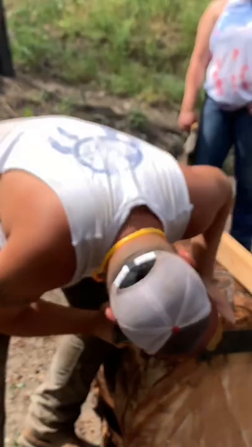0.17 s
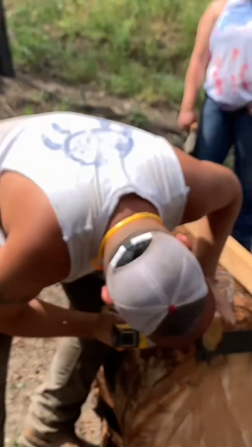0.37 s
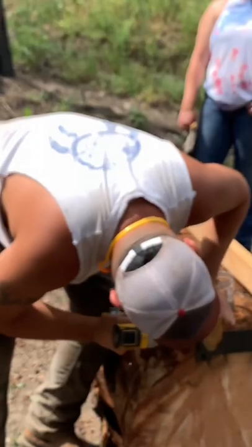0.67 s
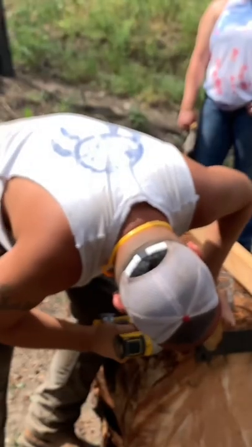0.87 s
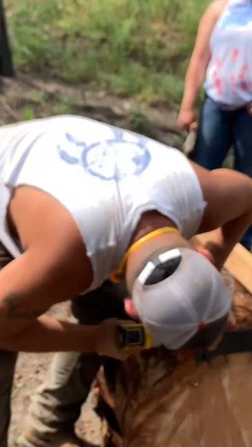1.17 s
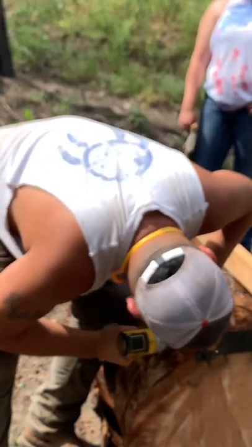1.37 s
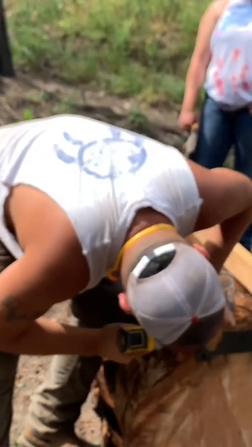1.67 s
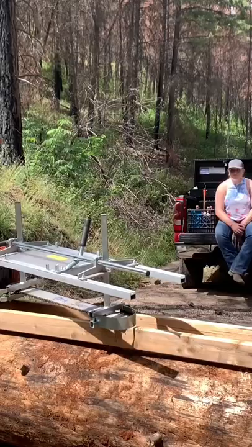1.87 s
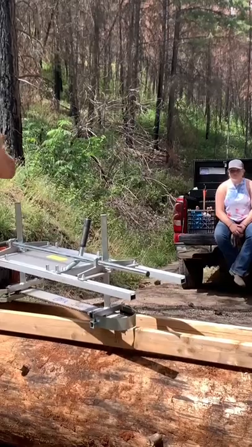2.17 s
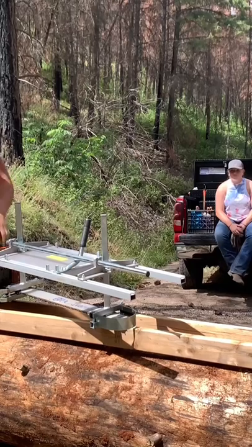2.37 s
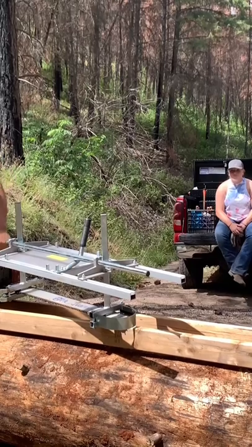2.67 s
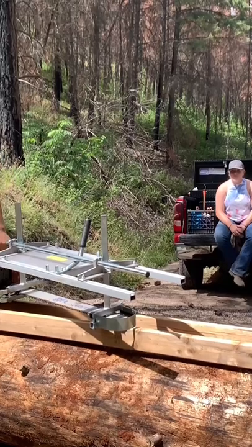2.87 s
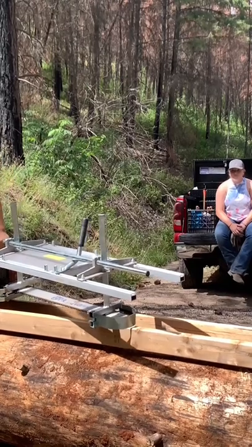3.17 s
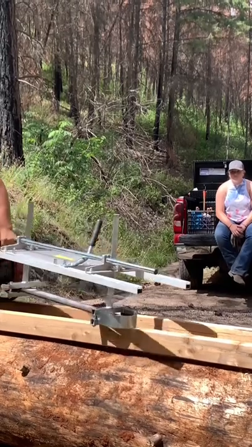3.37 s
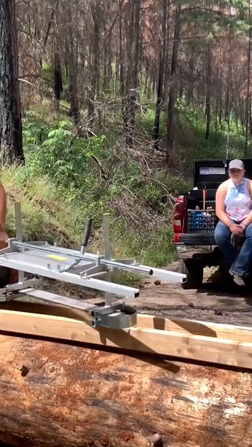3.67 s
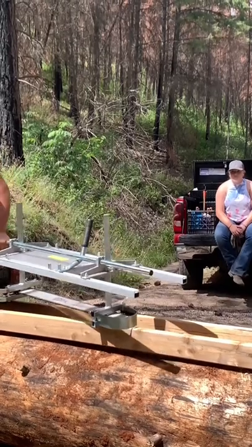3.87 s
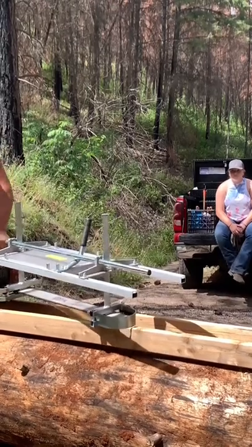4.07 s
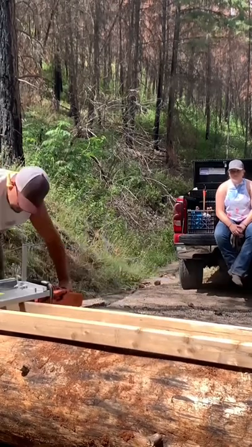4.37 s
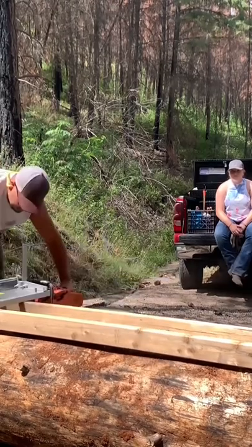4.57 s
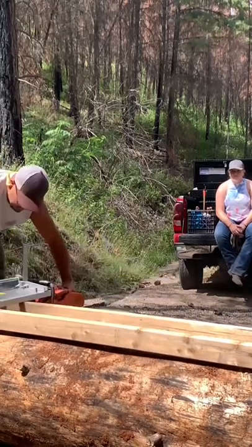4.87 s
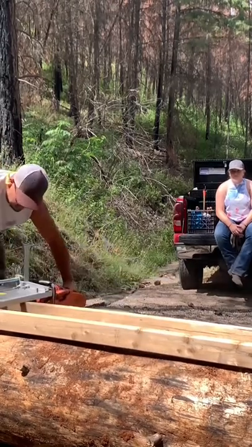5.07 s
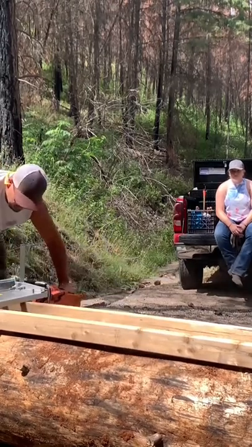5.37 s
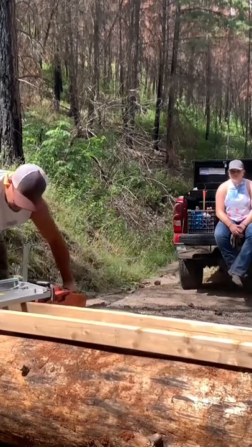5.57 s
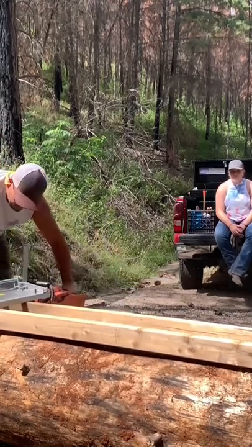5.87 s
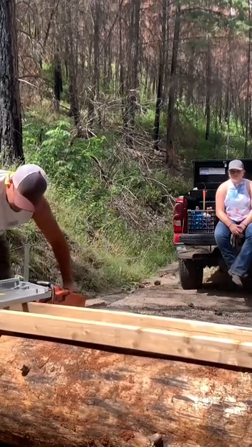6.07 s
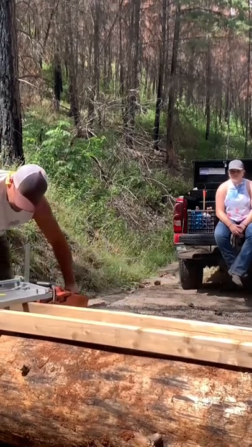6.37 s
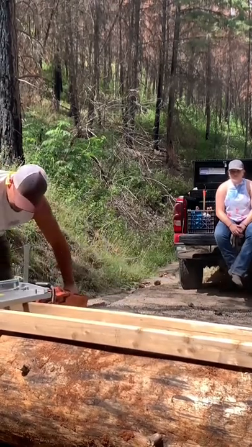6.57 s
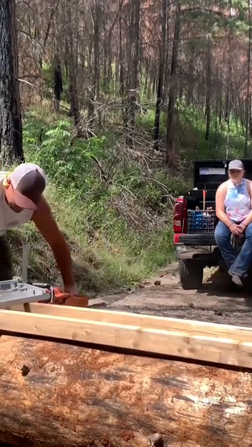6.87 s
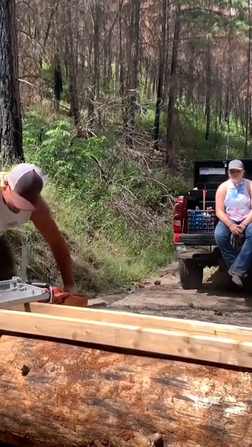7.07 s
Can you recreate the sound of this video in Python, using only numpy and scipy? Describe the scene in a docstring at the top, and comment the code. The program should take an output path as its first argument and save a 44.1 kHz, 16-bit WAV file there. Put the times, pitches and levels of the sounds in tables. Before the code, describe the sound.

Insects trill while an impact driver hammers two screws into a log, then a petrol chainsaw is cord-started, idles, blips and screams at full throttle outdoors.

```python
"""Impact driver and chainsaw in a clearing

Insects trill as filtered noise. An impact driver sinks two screws into a log: gear noise whirrs, each blow
starts decaying log and steel tones. A two-stroke chainsaw is pulled over and idles, burning on some turns
only, then is blipped to full speed: crank-timed pulses excite air box and muffler, noise makes the chain.
Two microphone ports hear it with their own phases and echoes; the level dips to silence three times."""
import sys
import numpy as np
from scipy import signal
from scipy.fft import rfft, irfft, next_fast_len
from scipy.io import wavfile
from scipy.ndimage import uniform_filter1d, map_coordinates

SR = 44100
rng = np.random.default_rng(int(sys.argv[2]) if len(sys.argv) > 2 else 0)


def master(y):
    """Save y as 16-bit WAV."""
    cut = np.clip(np.atleast_2d(y).T, -1, 1)
    pcm = np.round(cut * 32767)  # scale
    wavfile.write(sys.argv[1], SR, pcm.astype(np.int16))


N = 318843

# Brief dips to silence: centre_s, fade_s (each way)
DIPS = [(0.2, 0.047), (1.844, 0.039), (4.27, 0.0077)]
# Hammer blows: start_s, level_db (relative)
BLOWS = [(0.552, -1.5), (0.588, -11.5), (0.614, -11.5), (0.622, -3.5), (0.633, -8.5), (0.646, -13),
         (0.664, -15), (1.136, -17.5), (1.165, 1.5), (1.192, -0.5), (1.214, 0.5), (1.234, -9), (1.259, -8),
         (1.283, -6), (1.307, -9), (1.329, -17), (1.351, -13), (1.371, -16.5), (1.387, -15), (1.408, -10.5),
         (1.418, -13), (1.43, -17)]
# Screws: trigger_s, at_speed_s, let_go_s, motor_db, log ring over the blow first_db, last_db
SCREWS = [(0.46, 0.56, 0.672, -28.5, -10, -6), (1.11, 1.154, 1.43, -19.5, -26.5, 4)]
# Idle levels over time: time_s, exhaust_db, rattle_db (relative)
IDLE = [(3.21, -34, -57), (3.238, -18.5, -47), (3.362, -15.5, -52.5), (4.2, -19, -52.5), (4.26, -22.5, -64)]
# Spectrum of the saw's rattle and cracks: pitch_hz, density_db (relative)
RATTLE = [(530, -26.5), (900, -18.5), (1300, -28.5), (1940, -42.5), (2590, -22.5), (2860, -29.5),
          (4430, -33.5), (6540, -30), (8660, -27), (10800, -24.5), (13400, -33.5), (15200, -28),
          (16500, -58.5)]
# The muffler's second chamber: pitch_hz, width_hz, level_db
OUTLET = [(440, 300, -2), (893, 670, -5), (2370, 840, -5)]
# Throttle blips: open_s, shut_s, crank_hz, crank_at_shut_hz, easing of the climb (no unit), then relative
# levels: intake_db, exhaust_db, exhaust_at_shut_db, coasting_exhaust_db, chain_db, coasting_chain_db
BLIPS = [(4.296, 4.376, 53.14, 69.27, .3, -16, -18, -14, -17.5, -34.5, -41.5),
         (4.547, 4.646, 56.62, 79.36, 0.74, -14.5, -18.5, -14.5, -19.5, -26.5, -26.5),
         (4.837, 4.986, 60.46, 112.8, -0.04, -15, -19, -14.5, -19, -21, -20.5),
         (5.04, 5.279, 104.5, 142, 3, -14, -14, -17, -23.5, -21.5, -27.5),
         (5.427, 5.642, 109.1, 169.9, 0.97, -16.5, -19.5, -12.5, -17.5, -23, -26)]
# Turning points of the speed swings flat out: time_s, crank_hz
HUNT = [(5.55, 156.1), (5.745, 181.8), (5.9, 167.3), (6.038, 181), (6.172, 169.6), (6.299, 179.6),
        (6.435, 165.9), (6.549, 176.5), (6.65, 167.7), (6.743, 175.2), (6.838, 166.1), (6.932, 164.8),
        (7.03, 159.5), (7.17, 167.4), (7.3, 164)]

SECOND_PUFF_S = .0065  # the gas column swings back and puffs again


def amp(db):
    """Decibels to linear gain."""
    return 10 ** (np.asarray(db) / 20)


def unit(x):
    """x scaled to an rms of 1."""
    return x / np.sqrt(np.mean(x ** 2) + 1e-20)


def even(x, seconds):
    """x held at a running rms of 1."""
    return x / np.sqrt(np.abs(uniform_filter1d(x ** 2, int(seconds * SR))) + 1e-9)


def along(points, hz):
    """Read (pitch_hz, value) points on a log frequency axis."""
    f, v = np.transpose(points)
    return np.interp(np.log(hz + 1), np.log(f + 1), v)


def curves(rows):
    """A soft-edged gate open inside the rows' span, then one value per sample for each column."""
    s, *columns = np.transpose(rows)
    t = np.arange(N) / SR
    gate = uniform_filter1d(1. * ((t > s[0]) & (t < s[-1])), size=300)
    return [gate] + [np.interp(t, s, column) for column in columns]


def wobble(rate):
    """A smooth random curve, rate knots a second."""
    knots = rng.standard_normal(int(N * rate / SR) + 4)
    return map_coordinates(knots, [np.arange(N) * rate / SR])


def filtered(x, response):
    """x times a complex response of frequency."""
    m = next_fast_len(N + SR // 2)
    return irfft(rfft(x, m) * response(np.fft.rfftfreq(m, 1 / SR)), m)[..., :N]


def noise(spectrum, channels=1, patchy_db=0):
    """Coloured noise of rms 1 with time-frequency patches of random gain."""
    z = signal.stft(rng.standard_normal((channels, N)), nperseg=256)[2]
    field = uniform_filter1d(rng.standard_normal(z.shape[1:]), size=3, axis=0)
    field = uniform_filter1d(field, size=5, axis=1)
    white = signal.istft(z * amp(patchy_db * unit(field)), nperseg=256)[1][:, :N]
    return unit(filtered(white, lambda hz: amp(along(spectrum, hz))))


def resonant(x, modes):
    """x through parallel resonances of alternating sign, modes as (pitch_hz, width_hz, level_db)."""
    def response(f):
        total = 0
        for k, (centre, width, db) in enumerate(modes):
            band = 1j * f * width
            total = total + (-1) ** k * amp(db) * band / (centre ** 2 - f * f + band)
        return total
    return filtered(x, response)


def pulses(seconds, sizes):
    """Impulses shared between the two nearest samples."""
    at = np.clip(np.asarray(seconds) * SR, 0, N - 2)
    i = at.astype(int)
    return np.bincount(i, sizes * (1 - at + i), N) + np.bincount(i + 1, sizes * (at - i), N)


def bursts(seconds, dbs, t60):
    """An envelope that rises fast at each time and dies away."""
    t = np.arange(SR // 4) / SR
    shape = amp(-60 * t / t60) * (1 - np.exp(-t / .0015))
    return signal.fftconvolve(pulses(seconds, amp(dbs)), shape)[:N]


def turn_times(angle):
    """Moments at which the crank angle (in turns) passes a whole number."""
    return np.interp(np.arange(np.ceil(angle[0]), angle[-1]), angle, np.arange(N) / SR)


def place(x, ports, side, t60, wet_db, dull_hz):
    """Two ports hear the source at different phases and levels, plus unrelated echoes off the trees."""
    # Colour of the echoes: pitch_hz, level_db (relative)
    scatter = [(100, -26), (600, -20), (1500, -8), (4000, -2), (9000, -7), (15000, -5)]

    def port_response(hz):
        phase = np.exp(np.outer([.5j, -.5j], np.interp(hz, *np.transpose(ports))))
        return phase * amp(np.outer([.5, -.5], along(side, hz)))

    direct = filtered(x, port_response)
    hop = int(.1 * SR)  # the echo tail is redrawn this often, so its colour never stands still
    window = np.sin(np.pi * np.arange(2 * hop) / (2 * hop))
    fall = amp(-60 * np.arange(SR // 2) / SR / t60)
    wet = np.zeros((2, N + SR))
    x = np.pad(x, (0, 2 * hop))
    for i in range(0, N, hop):
        tail = rng.standard_normal((2, len(fall))) * fall / np.linalg.norm(fall)
        echo = signal.fftconvolve([x[i:i + 2 * hop] * window], tail, axes=1)
        wet[:, i:i + echo.shape[1]] += echo
    return direct + filtered(wet[:, :N], lambda hz: amp(wet_db + along(scatter, hz)) / (1 + (hz / dull_hz) ** 2))


def insects(passage):
    """A high trill: narrow-coloured noise in each port, with a quick random flutter."""
    # Insect spectrum: pitch_hz, density_db (relative)
    trill = [(3530, -65), (6000, -42), (7870, -21), (8570, -18.5), (10200, -4.5), (10800, -11),
             (11800, -21.5), (13500, -42)]
    # Mean level in each passage, parted by the first two dips: level_db
    passage_db = [-54, -52.5, -59.5]
    return amp(np.take(passage_db, passage) + 2.0 * wobble(50)) * noise(trill, channels=2)


def breeze():
    """Leaf noise partly shared by the ports, and low wind buffeting common to both."""
    # Breeze spectrum: pitch_hz, density_db (relative)
    leaf_colour = [(18, -30), (30, -17), (71, -27), (163, -10.5), (575, -11), (777, -13.5), (1090, -20),
                   (1190, -24.5), (5000, -43.5), (6500, -80), (11000, -120)]
    # Wind on the ports: centre_s, level_db, width_s
    gusts = [(1.9, -65.5, .04), (2.1, -63.5, .1), (2.254, -60.5, .05), (2.35, -63, .1), (2.8, -64, 0.11),
             (3.01, -45, 0.024), (3.2, -51, 0.044)]
    t = np.arange(N) / SR
    gate = curves([(DIPS[1][0],), (IDLE[0][0],)])[0]  # from the second dip until the saw catches
    leaves = noise(leaf_colour, channels=3)
    rustle = amp(-61 + 1.7 * wobble(11)) * (leaves[0] + .5 * leaves[1:])
    push = sum(amp(db) * np.exp(-((t - s) / width) ** 2) for s, db, width in gusts)
    buffet = push * noise([(20, -24), (45, 2.0), (65, 4.0), (110, -16), (200, -67.0)])
    return gate * (rustle + buffet)


def clearing():
    """Insects throughout; steady noise of the woods up to the second dip, a breeze after it."""
    # Woods spectrum: pitch_hz, density_db (relative)
    murmur = [(35, -45), (60, 2), (937, -8), (1100, -8.5), (2250, -23.5), (2540, -13.5), (3420, -20.5),
              (7000, -15.5), (9100, -33), (15400, -120)]
    passage = np.searchsorted([s for s, _ in DIPS[:-1]], np.arange(N) / SR)
    woods = (passage < 2) * amp(-67.0) * noise(murmur, channels=2)
    return insects(passage) + breeze() + woods


def motor_level():
    """Gain of the whirr: each trigger pull swells up to speed, holds, then is braked."""
    start_db, stop_s, stop_db = -22.5, .025, -35.5  # levels against the running motor
    level = 0
    for trigger, at_speed, let_go, db, *_ in SCREWS:
        gate, level_db = curves([(trigger, db + start_db), (at_speed, db), (let_go, db),
                                 (let_go + stop_s, db + stop_db), (let_go + 2 * stop_s, db + 1.3 * stop_db)])
        level = level + gate * amp(level_db)
    return level


def ringing_blows():
    """Each blow starts decaying log modes, louder as the screw seats, and a steel tone of unsteady phase."""
    # Log modes: pitch_hz, level_db (relative), t60_s
    log_modes = [(241, -13.5, 0.34), (255.6, -16, 0.47), (492, -12, 0.12), (703, 2, 0.081),
                 (870, 4.5, 0.026), (1092, 1.5, 0.035), (1660, -4, .03), (144, -18.5, 0.13)]
    s, db = np.transpose(BLOWS)
    seat = np.reshape([(b, first, c, last) for _, b, c, _, first, last in SCREWS], (-1, 2))
    log_db = np.interp(s, *seat.T)
    steel_hz = 3355 * np.exp(0.18 * rng.standard_normal(len(s)))  # another pitch each blow
    t = np.arange(SR // 2) / SR
    rise = 1 - np.exp(-t / 0.0029)
    sound = np.zeros(N)
    for start, blow_db, wood_db, hz in zip(s, db, log_db, steel_hz):
        ring = 0
        for mode_hz, mode_db, t60 in log_modes:
            fade = amp(mode_db + rng.normal(0, 0.61) - 60 * t / t60)
            ring = ring + fade * np.sin(2 * np.pi * mode_hz * rng.normal(1, 0.014) * t)
        drift = np.cumsum(rng.normal(0, 0.28, len(t)))  # phase, radians
        clack = amp(-60 * t / 0.07) * np.sin(2 * np.pi * hz * t + drift)
        blow = amp(blow_db + wood_db) * ring + amp(blow_db - 12.5) * clack
        sound[int(start * SR):][:len(t)] += blow * rise
    return sound


def driver():
    """Gear noise whirrs and bursts at each hammer blow, over the ringing log and tool."""
    # Gear spectrum: pitch_hz, density_db (relative)
    gears = [(180, -60.5), (300, -19), (607, -14), (694, -6.5), (1480, -11.5), (4030, -12.5), (6780, -16),
             (8870, -6), (10700, -13), (15400, -25), (16500, -46.5)]
    # Phase between the ports: pitch_hz, left_lead_rad
    driver_ports = [(0, 0), (2500, .1), (3270, .8), (3530, .2), (7150, 0), (7840, -3.1), (9470, -3.2),
                    (10500, -6.3), (11600, -6.3), (12500, -9.3), (14000, -9.5), (14800, -12.6)]
    s, db = np.transpose(BLOWS)
    whirr = motor_level()
    sound = (whirr + bursts(s, db - 5.5, 0.022)) * noise(gears, patchy_db=4.5)[0]
    mesh = unit(resonant(rng.standard_normal(N), [(4580, 71, 0)]))
    sound += amp(-4.5) * whirr * mesh * (np.arange(N) < s[0] * SR)  # gear mesh sings before the first blow
    sound += ringing_blows()
    return place(sound, driver_ports, side=[(100, -1.3), (9000, -1.1)], t60=1.0, wet_db=-9.5, dull_hz=2404)


def handling():
    """Resonant noise bursts knock on the housing and the cord spins the engine; apart from the hands, a thin
    tone peeps nearby."""
    # Knocks: start_s, level_db (relative), pitch_hz
    taps = [(2.5, -49.5, 1400), (2.52, -51, 2500), (2.538, -44, 500), (2.681, -51, 802),
            (2.794, -38.5, 1350), (3.05, -40.5, 1309), (3.121, -46, 840), (3.174, -27, 827)]
    # Starter cord: time_s, level_db
    cord = [(3.08, -62), (3.104, -60), (3.18, -32), (3.198, -49.5), (3.22, -26)]
    # Thin tone: start_s, length_s, pitch_hz, level_db
    peep = (2.845, .065, 4200, -59)
    s, length, hz, db = peep
    t = np.arange(N) / SR
    swell = np.sin(np.pi * np.clip((t - s) / length, 0, 1) ** 0.49) ** .5
    sound = amp(db) * swell * np.sin(2 * np.pi * hz * t)
    for s, db, hz in taps:
        housing = [(hz, 120, 0), (1.7 * hz, 200, -4), (3200, 1500, -16)]
        sound += bursts([s], [db - 3], 0.099) * unit(resonant(rng.standard_normal(N), housing))
    gate, db = curves(cord)
    ratchet = unit(resonant(rng.standard_normal(N), [(386, 740, -20.5), (719.4, 53, 2.5)]))
    return sound + gate * amp(db + 1.7 * wobble(76)) * ratchet


def idling():
    """Every turn puffs through the muffler twice; turns that burn add a bark, a thump and a crack."""
    # Turns that burn: start_s, bark_db, crack_db (relative)
    fired = [(3.218, -11, -25), (3.271, -19, -21.5), (3.301, -1.5, -9.5), (3.365, -6, -11.5),
             (3.404, 6.5, -43.5), (3.446, -5.5, -14), (3.486, -3, -32.5), (3.531, 1.5, -17.5),
             (3.574, 0, -26.5), (3.615, -3, -13.5), (3.678, -8.5, -11), (3.736, 1, -21), (3.779, -5.5, -50),
             (3.822, -1.5, -23.5), (3.866, 0, -21), (3.91, -7, -47.5), (3.954, -7.5, -12.5),
             (4.025, 1, -32.5), (4.071, -2.5, -13), (4.116, -8, -50), (4.162, -1.5, -51.5),
             (4.21, -1.5, -24)]
    # Muffler from behind: pitch_hz, width_hz, level_db
    idle_pipe = [(167.5, 35, 8), (448, 123, 6), (920, 110, -10.5), (1380, 77, -24.5), (2420, 320, -31)]
    gate, exhaust_db, rattle_db = curves(IDLE)
    s, bark_db, crack_db = np.transpose(fired)
    # Burns fall on whole turns, at about 46 turns per second.
    whole = np.cumsum(np.round(np.diff(s, prepend=s[0], append=s[-1] + 1) * 46))
    when = np.interp(np.arange(whole[-1]), whole, np.append(s, s[-1] + 1))
    chance = rng.standard_normal((len(when), 3))
    when = when + 0.00073 * chance[:, 2]

    def muffler(x):
        return resonant(resonant(x, idle_pipe), OUTLET)

    puffs = pulses(when + 0.002037, amp(1.5 * chance[:, 0]))
    puffs += 0.75 * pulses(when + 0.0022 + SECOND_PUFF_S, amp(2.1 * chance[:, 1]))
    gas = rng.standard_normal(N) * bursts(when, np.full(len(when), -34.), 0.3)
    puff = gate * amp(exhaust_db - 6) * unit(muffler(resonant(puffs, [(500, 1500, 0)]) + gas))
    bark = muffler(pulses(s + 0.0012, amp(bark_db + 32.5))
                   + pulses(s + 0.00039 + SECOND_PUFF_S, amp(bark_db + 18.0)))
    # The thump grows by 0.2 dB per dB of crack.
    thump = resonant(pulses(s + 0.0022, amp(37 + .2 * crack_db)), [(162, 63, 0.0095)])
    ticks = bursts(when, np.zeros(len(when)), 0.15)
    rattle = gate * amp(rattle_db) * (1.2 + .5 * ticks) * noise(RATTLE, patchy_db=5.5)[0]
    crack = bursts(s - .001, crack_db, 0.043) * noise(RATTLE, patchy_db=1)[0]
    return puff + bark + thump + rattle + crack


def crank():
    """Crank speed in Hz: climbs while the throttle is open, coasts down between blips, then hunts flat out."""
    u = np.linspace(0, 1, 12)
    climbs = []
    for a, b, low, high, ease, *_ in BLIPS:
        climbs.append((a + u * (b - a), low + (high - low) * np.expm1(-ease * u) / np.expm1(-ease)))
    t = np.arange(N) / SR
    s, hz = np.transpose(HUNT)
    k = np.interp(t, s, np.arange(len(s)))
    eased = k // 1 + np.sin(np.pi / 2 * (k % 1)) ** 2  # rounds the turning points
    hunting = np.interp(eased, np.arange(len(s)), hz)
    return np.where(t < BLIPS[-1][1], np.interp(t, *np.hstack(climbs)), hunting)


def throttle(speed):
    """Gate, throttle opening and levels of intake, exhaust and chain: from the blips, then from the speed."""
    # Intake, exhaust, chain flat out: at_crank_hz, level_db, slope_db_per_hz, lag_s, drift_db_per_s
    flat_out = [(172.5, -20, 0, .03, -2), (175, -18, -0.02, 0.042, -.5), (171, -25, 0.0845, .03, -1.5)]
    open_s, shut_s = 0.0086, 0.052  # the carburettor answers the finger
    rows, coast = [], (-30, -26, -58)
    for a, b, _, _, _, intake, exhaust, at_shut, exhaust_coast, chain, chain_coast in BLIPS:
        sagged = intake - 13.5 * (b - a)  # the intake fades as the climb goes on
        rows += [(a, *coast, 0), (a + open_s, intake, exhaust, chain, 1), (b, sagged, at_shut, chain, 1)]
        coast = (intake - 23, exhaust_coast, chain_coast)
        rows += [(b + shut_s, *coast, 0)]
    t = np.arange(N) / SR
    end = BLIPS[-1][1]
    flat = np.clip((t - end) / shut_s, 0, 1)
    held = [db + slope * (np.interp(t - lag, t, speed) - hz) + drift * (t - end)
            for hz, db, slope, lag, drift in flat_out]
    _, *levels, opened = curves(rows[:-1])  # the last blip stays open
    return [t > DIPS[-1][0], opened] + [(1 - flat) * x + flat * y for x, y in zip(levels, held)]


def exhaust_bark(speed, slow, burns, swung):
    """Burn pulses ring the muffler, crossfading from cool to hot-gas resonances, over turbulent gas."""
    # Muffler with hot gas at speed: pitch_hz, width_hz, level_db
    hot_pipe = [(518.4, 96, 9.5), (683, 100, 2), (827, 36.7, 6.5), (2320, 300, -51.5), (1176, 67, -17),
                (3370, 170, -24.5)]
    # Muffler from the side at low speed: pitch_hz, width_hz, level_db
    cool_pipe = [(278, 90, 6), (520, 78, 7.5), (670, 95, 3.5), (1390, 200, -8.5)]
    hot = np.clip((speed - 80) / 40, 0, 1)
    cool_ring = unit(resonant(resonant(swung, cool_pipe), OUTLET))
    pulsed = even(hot * unit(resonant(burns, hot_pipe)) + (1 - hot) * cool_ring, .05)
    turbulence = unit(resonant(rng.standard_normal(N), [(615, 480, 10.0), (1353, 1200, -7.5)]))
    return pulsed + (0.087 + 0.27 * slow) * turbulence


def chain_hiss(speed, angle, burns):
    """Chain and fan noise beats once a turn; a casing resonance sings on the crank orders near it."""
    # Chain spectrum: pitch_hz, density_db (relative)
    chain_colour = [(530, -29), (900, -25.5), (1110, -23), (3150, -21), (3560, -24.5), (5320, -27.5),
                    (7120, -20), (8550, -25), (9310, -16.5), (11300, -19), (12500, -16), (13300, -27),
                    (15200, -16), (15900, -40), (16500, -61.5)]
    rise = np.clip((np.arange(N) / SR - HUNT[1][0]) / 0.802, 0, 1)  # the casing resonance creeps up
    low, high = (even(resonant(resonant(burns, [(hz, 240, 0)]), [(hz, 240, 0)]), 0.043) for hz in (3420, 3650))
    sing_level = amp(2.586 * wobble(7)) * np.clip((speed - 130) / 30, 0, 1)
    sing = sing_level * (0.44 * (1 - rise) * low + 0.3 * rise * high)
    beat = 1 + 0.075 * np.cos(2 * np.pi * angle) + 0.1 * wobble(45)
    return beat * noise(chain_colour, patchy_db=2.0)[0] + sing


def revving():
    """One pulse a turn: the air box booms, the muffler barks, chain and fan hiss in time with the crank."""
    # Hard burns as the throttle opens: start_s, level_db (relative)
    hard_burns = [(4.2856, -33), (4.309, -5.5), (4.3214, -15.5), (4.3397, -4), (4.3564, -21), (4.562, -4),
                  (4.591, -7.5), (4.6044, -14), (4.6165, -3), (4.833, -4.5), (4.8616, -11.5),
                  (5.4271, -16.5)]
    # Air box: pitch_hz, width_hz, level_db per pass (two passes)
    air_box = [(104.8, 142, 6.5)]
    # Single burns while coasting: time_s, level_db (added pulse against an even turn)
    stray_burns = [(4.48, 4), (4.715, 2)]
    speed = crank()
    gate, opened, intake_db, exhaust_db, chain_db = throttle(speed)
    angle = np.cumsum(speed) / SR
    when = turn_times(angle)
    # Slow turns are uneven, less so with the throttle shut.
    slow = np.clip((150 - speed) / 100, .06, 1) * (.25 + .75 * opened)
    rough = slow[(when * SR).astype(int)]
    chance = rng.standard_normal((len(when), 3))
    when = when + .0003 * rough * chance[:, 0]
    burns = pulses(when, amp(2 * rough * chance[:, 1]))
    s, db = np.transpose(stray_burns)
    stray = pulses(when[np.searchsorted(when, s - .008)], amp(db))
    swung = burns + stray + pulses(when + SECOND_PUFF_S, 0.77 * amp(9.3 * rough * chance[:, 2]))
    boom = amp(intake_db) * even(resonant(resonant(burns, air_box), air_box), .04)
    bark = amp(exhaust_db) * exhaust_bark(speed, slow, burns, swung)
    hiss = amp(chain_db) * chain_hiss(speed, angle, burns)
    s, db = np.transpose(hard_burns)
    cracks = bursts(s, db - 1.5, 0.026) * noise(RATTLE, patchy_db=6.5)[0]
    return gate * (boom + resonant(bark + hiss, [(908, 11800, 0)])) + cracks


def scene():
    """The clearing, the driver, then the saw, the hands on it and a thin peep nearby, placed at the same ports."""
    # Phase between the ports: pitch_hz, left_lead_rad
    saw_ports = [(0, 0), (1460, .8), (3010, 2), (3400, 3.5), (3700, 2.7), (5940, 3.4), (6400, 5.8),
                 (7320, 4.2), (8960, 2.9), (10400, .1), (11600, -.1), (12500, -3), (14300, -3.4),
                 (15200, -6.3)]
    # Level between the ports: pitch_hz, left_over_right_db
    saw_side = [(100, 0), (250, .5), (500, 1.9), (1000, .8), (2000, -.9), (4000, -.8), (8000, 0)]
    saw = place(idling() + revving(), saw_ports, saw_side, t60=.11, wet_db=3, dull_hz=20000)
    hands = place(handling(), saw_ports, saw_side, t60=.15, wet_db=-3, dull_hz=3000)
    return clearing() + driver() + hands + saw


def record(dry):
    """The level dips by short fades out and in; peaks are clipped and nothing is kept above 16.8 kHz."""
    t = np.arange(N) / SR
    fade = np.prod([np.clip(np.abs(t - s) / width, 0, 1) for s, width in DIPS], axis=0)
    return filtered(np.clip(dry * fade, -.97, .97), lambda hz: hz < 16800)


dry = scene()
out = record(dry)
master(out)
```